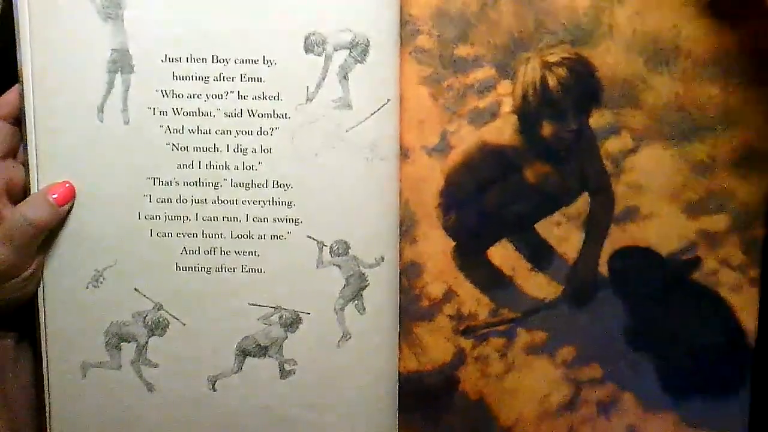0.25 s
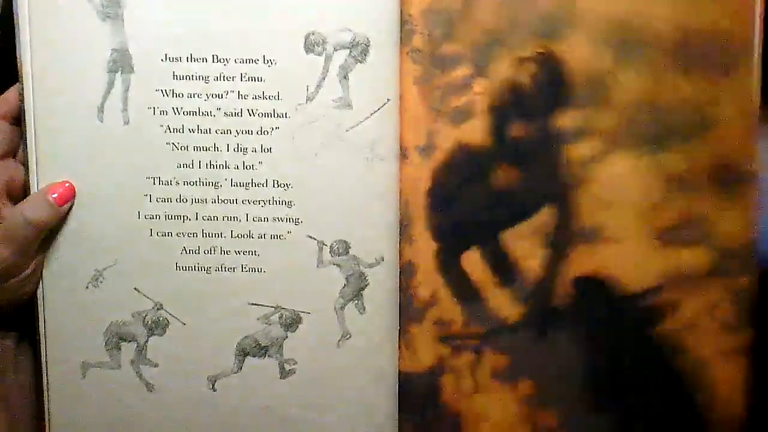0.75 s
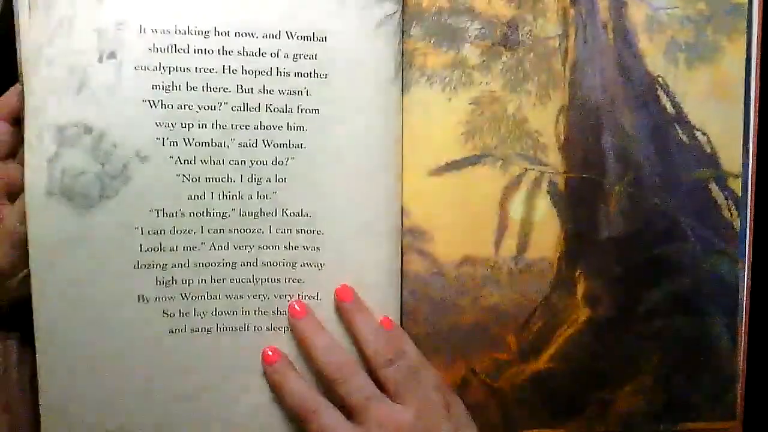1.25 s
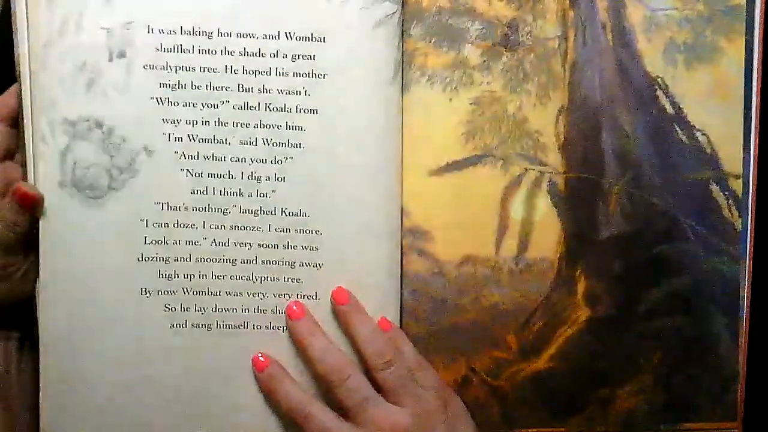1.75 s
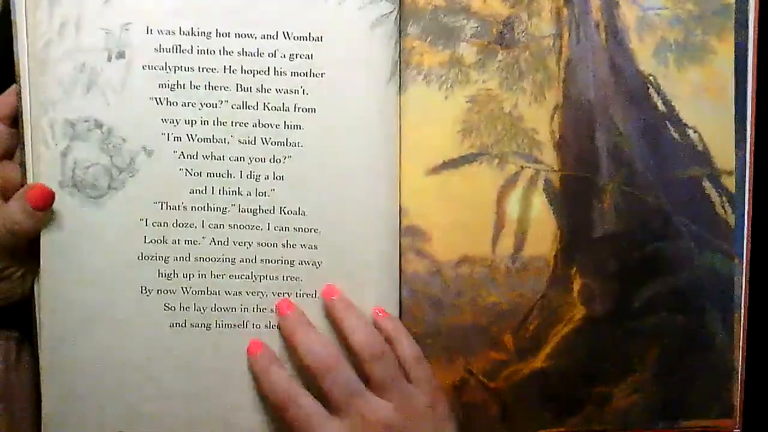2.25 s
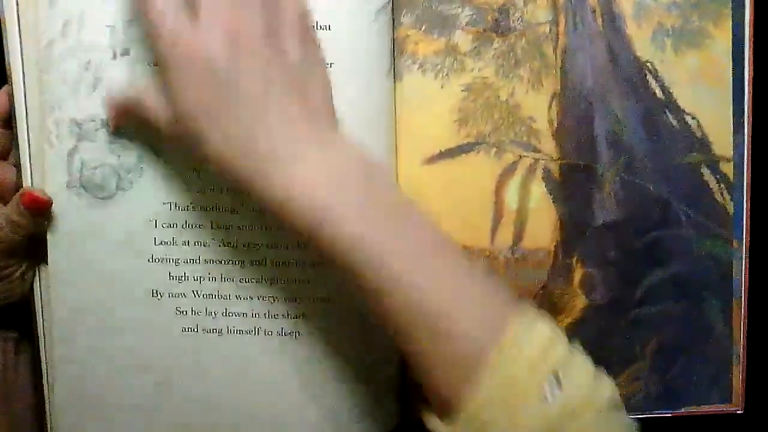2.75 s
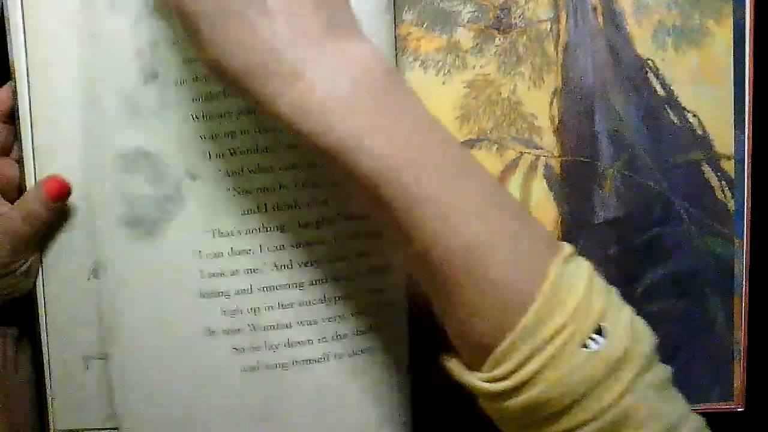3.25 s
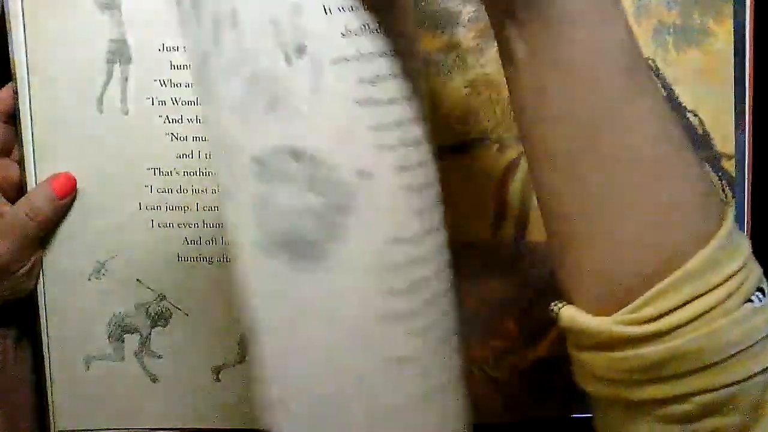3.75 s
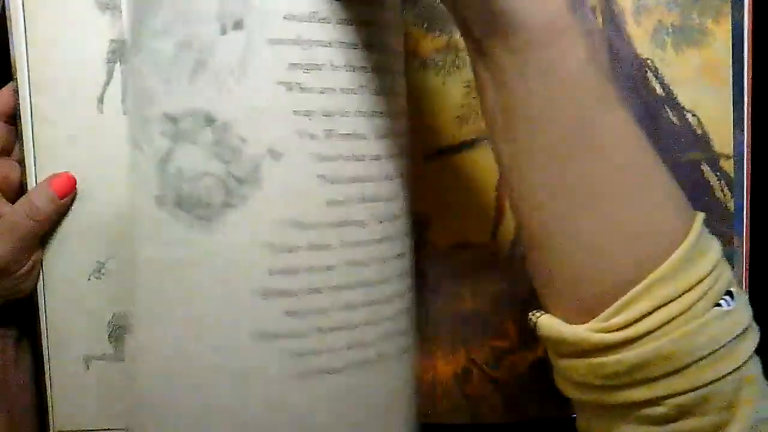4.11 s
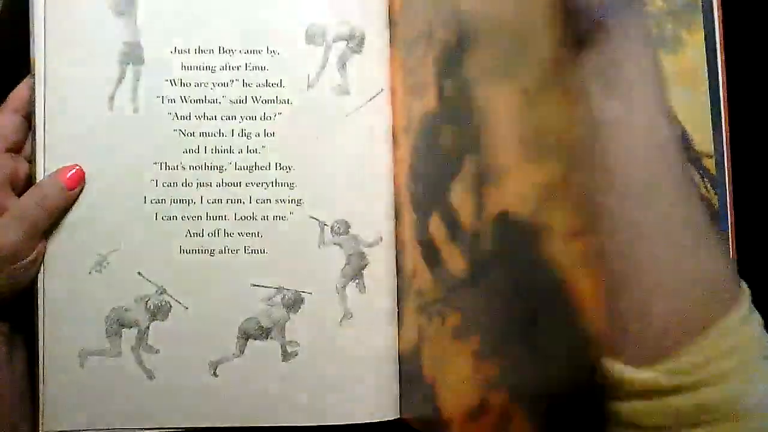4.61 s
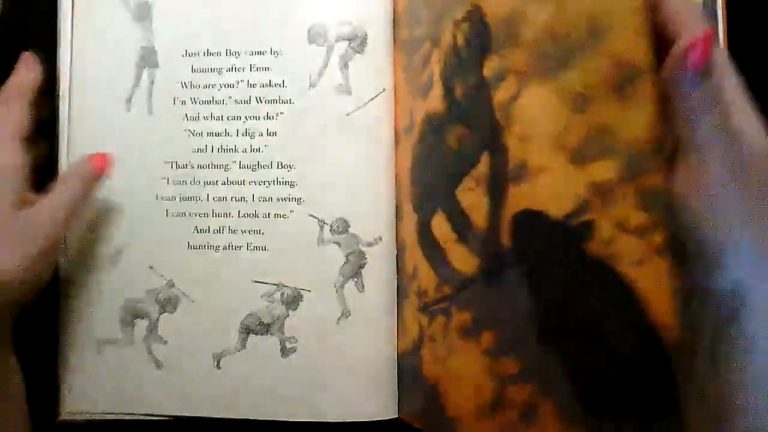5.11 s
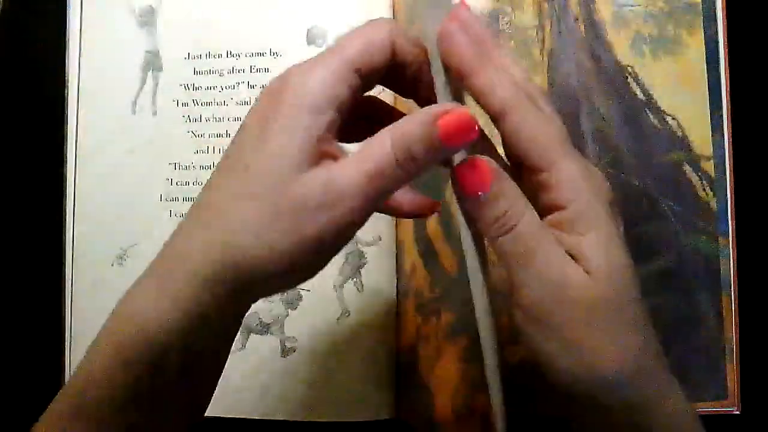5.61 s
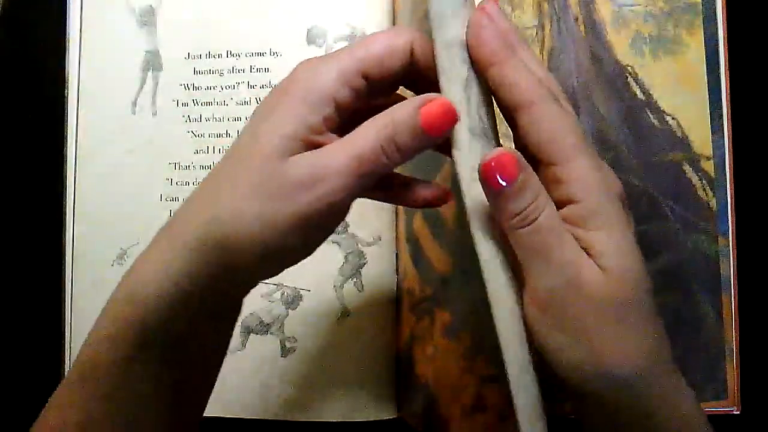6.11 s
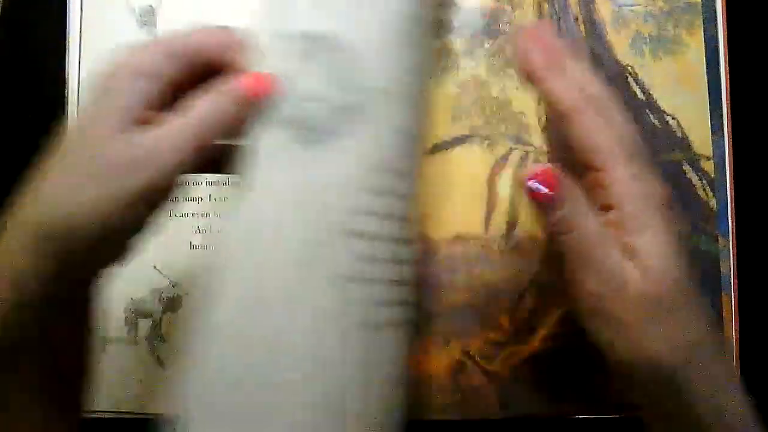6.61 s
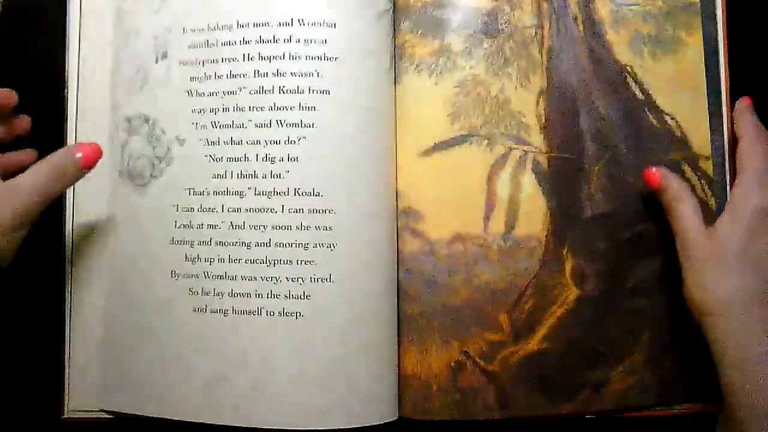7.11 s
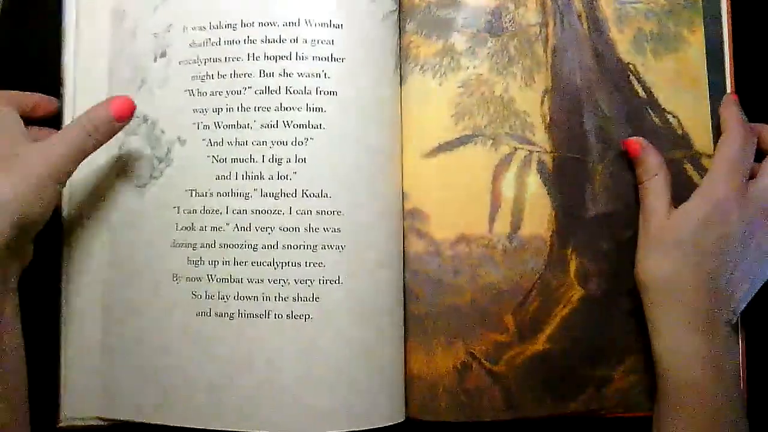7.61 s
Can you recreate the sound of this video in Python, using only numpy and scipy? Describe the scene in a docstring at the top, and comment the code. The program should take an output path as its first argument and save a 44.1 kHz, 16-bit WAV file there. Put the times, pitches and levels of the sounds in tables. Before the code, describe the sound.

A large, stiff, glossy book page is handled close to a single microphone in a quiet room. Soft rustle and finger hiss open; from 0.3 to 0.5 s the sheet buckles in a tight run of hollow, mid-pitched snaps with a swelling rustle. Another strong snap comes at 0.75 s, then weaker ones to 1.7 s with light rubbing. From about 2.2 to 3.8 s it is sparser: faint hiss, thin fingertip whistles and small isolated pops. At 3.9 s the densest, loudest burst breaks out, rapid lower-toned snaps and flapping paper until 4.3 s. Soft, low table knocks stand out afterwards, strongest around 5.1 to 5.2 s, with scattered snaps up to 6 s. A short run of brighter snaps at 6.4 to 6.7 s turns the page again. A dull thump near 7.2 s and quiet rubbing close the scene at 7.9 s.

```python
"""A large stiff page is lifted, bent and turned by hand on a table, close to one microphone, for 7.86 s.
It starts with soft rustle and finger hiss; within half a second the sheet buckles in a tight run of snaps.
Sparser snaps, hiss and whistles follow until 3.9 s, when the densest, loudest burst of snaps breaks out.
Table knocks stand out after it, a short run of snaps comes near 6.5 s, and quiet rubbing ends the scene.
Snaps are short tonal swings, rubbing and whistles are filtered noise, and knocks are decaying sine modes."""
import sys
import numpy as np
from scipy import signal
from scipy.fft import rfft, irfft, next_fast_len
from scipy.io import wavfile

SR = 44100
rng = np.random.default_rng(int(sys.argv[2]) if len(sys.argv) > 2 else 0)


def log_audio(samples):
    """Write samples as a 16-bit WAV file to the path given in sys.argv[1]."""
    # one column per channel
    frames = np.atleast_2d(samples).T
    # limit to full scale, then quantise
    limited = np.clip(frames, -1, 1)
    pcm = np.round(limited * 32767).astype(np.int16)
    wavfile.write(sys.argv[1], SR, pcm)


N = 346626

# Faint room tone. Each row: frequency in Hz, relative level in dB per Hz.
ROOM_SPECTRUM = [(20, -20), (48, -2), (64, 10.5), (90, -4.5), (169, -8.5), (222, -3.5), (424, -15),
                 (1280, -24), (2080, -32.5), (9000, -30), (15700, -32.5)]
# Low modes of the table top. Each row: pitch in Hz, free time to fall 60 dB in seconds, swell in seconds.
TABLE_MODES = [(66.1, 0.49, 0.0072), (130.5, 0.3, 0.019), (222.8, 0.083, 0.0013)]
# The book knocks the table. Each row: time in seconds (the swell begins 12 ms earlier), level of the lowest
# mode in dB, second and third mode in dB re the lowest, ring length as a share of the free ring.
BOOK_KNOCKS = [(0.104, -54, -8, -45, 0.51), (0.374, -41.5, -11, -11, 0.93), (0.797, -46, 3, -13, 0.63),
               (0.849, -44.5, 9.5, 9, 0.35), (0.989, -45.5, 2, 13, 0.45), (1.151, -54, -18.5, -29, 0.38),
               (1.668, -49.5, -13, -30, 0.67), (3.418, -56.5, -7, 3, 0.83), (3.942, -41.5, -22, -12, 1),
               (4.049, -35.5, -4, -11, 0.92), (4.196, -42, -15, -2, 0.83), (4.51, -42, -1, -3, 0.95),
               (4.599, -39, -10, 1.5, 0.42), (4.73, -50.5, 0, 2.5, 0.62), (4.892, -63, 10.5, 29, 1),
               (4.993, -47.5, 0, -36, 0.55), (5.118, -31, -6.5, -49, 0.75), (5.199, -29.5, 5.5, -6.5, 0.69),
               (5.456, -51, 6.5, 15.5, 0.89), (5.948, -61, 7, 23.5, 0.8), (6.421, -50.5, -5, 19.5, 0.5),
               (6.552, -48.5, 7, -2, 0.53), (6.99, -40.5, -11, -13.5, 0.57), (7.17, -32.5, -17, -15, 0.85),
               (7.332, -50, 8.5, 4, 0.47), (7.42, -50, -30, -9, 0.62), (7.644, -46.5, -10.5, -39.5, 1.0)]
# A fingertip drags and the glossy page whistles. Each row: time of full level in seconds, hold in seconds,
# level in dB, pitch in Hz.
PAGE_WHISTLES = [(0.135, 0.044, -58.5, 4930), (2.33, .11, -66, 5840), (2.398, 0.045, -61, 2710),
                 (3.01, .1, -74, 4140), (3.018, 0.09, -81, 6770), (4.724, 0.15, -74, 4180),
                 (4.73, 0.14, -77, 5340), (4.763, .12, -61, 1835), (5.71, 0.089, -74, 4060),
                 (7.253, .06, -71, 6800), (7.33, 0.049, -72, 4650), (7.296, 0.092, -66.5, 3090)]
# Fingers slide over the page. Each row: time of full level in seconds, swell in seconds, hold in seconds,
# hiss in dB, nail scratch in dB re the hiss.
FINGER_SLIDES = [(0, .03, 0.012, -55.5, 5.5), (.129, 0.036, 0.041, -62.5, 1), (.39, 0.13, 0.017, -63, 17.5),
                 (.49, 0.16, 0.14, -63, 4.5), (.7, 0.14, 0.056, -58, 3.5), (.92, 0.32, 0.046, -60, 0),
                 (1.0, 0.12, 0.19, -69, -2.5), (1.15, 0.23, 0.012, -62, -9),
                 (1.22, 0.13, 0.0036, -67.5, 1.5), (1.53, 0.16, 0.0047, -64.5, 4.5),
                 (2.251, 0.025, 0.011, -67, 5), (2.4, 0.3, 0.021, -67, 0), (2.6, 0.33, 0.0065, -54.5, -6),
                 (2.74, 0.42, 0.03, -58, -11), (2.886, 0.036, 0.017, -68, 0.5),
                 (3.02, 0.027, 0.089, -68, -24), (3.162, 0.014, 0.06, -48.5, -4),
                 (3.405, 0.018, 0.12, -82, 4), (3.67, 0.2, 0.032, -81.5, 2), (3.859, 0.014, 0.2, -71, 1.5),
                 (4.19, 0.25, 0.019, -72, 5), (4.43, 0.86, 0.033, -64, -2), (4.85, 0.35, 0.023, -72, -9.5),
                 (5.09, 0.57, 0.03, -74.5, -3.5), (5.459, 0.02, .003, -63, -9),
                 (5.8, 0.28, 0.0043, -72, -1), (6.288, 0.13, 0.0091, -75.5, 0.5),
                 (6.418, 0.024, 0.15, -78.5, 3.5), (6.958, 0.017, 0.0026, -81, 11),
                 (7.1, 0.09, 0.26, -73.5, -1), (7.3, 0.14, 0.095, -80.5, 3.5),
                 (7.86, 0.15, 0.0041, -73, -0.5)]
# The sheet is bent or rubbed. Each row: time of full level in seconds, swell in seconds, hold in seconds,
# rustle in dB, flapping depth in dB re the rustle, scraping rim in dB re the rustle.
SHEET_BENDS = [(0, .03, 0.027, -53, 3.5, 0), (.165, 0.15, 0.013, -65.5, -13, 9),
               (.285, 0.035, .03, -53, -2.5, -28), (.392, 0.11, 0.033, -35, -6, -9.5),
               (.45, 0.033, 0.047, -45, 2.5, -6.5), (.58, 0.088, 0.083, -56.5, -7.5, 4),
               (.755, 0.09, 0.0022, -34, 1, -33), (.828, 0.11, 0.023, -40, 2, -24),
               (.9, .05, 0.032, -57, -21, -1), (.972, 0.027, 0.037, -47.5, 9.5, -32),
               (1.15, 0.22, 0.002, -71.5, 6, 4.5), (1.205, 0.0095, 0.029, -48.5, -5, -7.5),
               (1.44, 0.022, 0.018, -72, 5, 5), (1.53, .14, .005, -49.5, -8.5, -10),
               (1.62, 0.0087, 0.0092, -42.5, -0.5, 2.5), (1.67, 0.045, 0.015, -42, -18.5, -11.5),
               (2.251, 0.016, 0.0025, -55.5, -32, -14), (2.41, 0.22, 0.065, -61, -30, 0.5),
               (2.53, 0.21, 0.056, -71, -31, 5), (2.72, 0.2, 0.11, -85, -19, 6.5),
               (2.89, 0.022, 0.0088, -56.5, -16.5, -37.5), (2.935, .05, 0.006, -59, -3, -18),
               (3.02, .05, 0.067, -58, -7.5, -6.5), (3.162, 0.025, 0.051, -49, -4.5, 0.5),
               (3.305, 0.023, 0.0017, -47.5, 5.5, -12), (3.405, .05, 0.15, -62, -29, -10),
               (3.669, 0.21, 0.026, -57, -15, -15.5), (3.859, 0.052, 0.14, -45, 2, -21),
               (3.92, 0.077, 0.051, -46.5, 12.5, -2.5), (4.08, 0.28, 0.16, -39.5, 2.5, -6),
               (4.29, .1, 0.049, -43, 0, -15.5), (4.4, 0.076, 0.037, -61, -31, -0.5),
               (4.463, .015, 0.021, -57, 14, -22), (4.535, 0.05, 0.0073, -71, 25.5, -9),
               (4.62, 0.092, 0.04, -75.5, 30, -36), (4.715, .06, 0.0068, -64, 12.5, -26.5),
               (4.695, 0.02, .19, -70, -30, 2), (4.99, 0.19, 0.058, -69, 12.5, -14),
               (5.06, 0.0092, 0.036, -64.5, 12, -0.5), (5.188, .015, 0.0056, -43, 11, -9.5),
               (5.457, 0.015, 0.044, -37, 7, -23), (5.61, .012, 0.052, -66, 0, 0),
               (5.713, 0.011, 0.01, -57, -17, 2.5), (5.8, 0.2, 0.0021, -52, -13.5, -5.5),
               (5.938, 0.012, 0.019, -46.5, -0.5, -19), (6.055, 0.03, 0.03, -69, 12, -11),
               (6.288, 0.19, 0.014, -75, -21, 10), (6.414, 0.01, 0.014, -44.5, 3.5, -29),
               (6.5, .05, 0.11, -53, 1, -9.5), (6.65, .15, 0.016, -53.5, 3, -25),
               (6.955, 0.013, .003, -65.5, 6.5, 3.5), (7.075, .015, 0.09, -70, -17, 3),
               (7.125, 0.11, 0.17, -66, 7, -10.5), (7.36, 0.0933, 0.033, -81.5, 18.5, 7),
               (7.451, 0.065, 0.059, -77.5, -2, -2), (7.63, 0.044, 0.0043, -65.5, 1.5, -1),
               (7.86, .12, .003, -61.5, -33, -11.5)]
# Colours of the page's five parts. Each row: frequency in Hz, relative level in dB per Hz.
RUSTLE_SPECTRUM = [(290, -32.5), (500, -11), (559, -4), (761, 6.5), (1260, 11), (1370, 7), (1860, -7),
                   (2400, -28), (3120, -59.5), (5280, -120)]
FLAP_SPECTRUM = [(120, -9.5), (200, -1), (400, -8.5), (600, -9), (900, -19.5)]
RIM_SPECTRUM = [(1400, 5), (1900, 0.5), (2700, 2.5), (3300, -6.5), (5000, -38)]
SCRATCH_SPECTRUM = [(2800, -12.5), (3600, -2.5), (5800, -2.5), (7200, -19)]
HISS_SPECTRUM = [(5000, -34), (6600, -3.5), (8500, -3.5), (10500, -2.5), (13000, -10), (15900, -12)]
# The sheet buckles. Each row: start in seconds, swing peak in dB, pitch in Hz, crack in dB re the swing peak,
# ring length as a multiple of a dry snap's.
BUCKLES = [(.326, -26.5, 1340, -19.5, 1.7), (0.348, -17.5, 1430, -20, 4.2), (.378, -16, 1450, -15, 1.6),
           (.398, -16, 1400, -24.5, 2.6), (0.412, -19.5, 1010, -20.5, 1.37), (0.431, -30.5, 1210, -25.5, 2),
           (0.443, -21.5, 1250, -22, 2.2), (0.463, -33, 1110, -27, 2.6), (0.475, -25.5, 1140, -16, 1.1),
           (.541, -44, 1360, 4.5, 4.5), (.733, -36.5, 1130, -9, 3.9), (0.748, -17.5, 1070, -33, 3.15),
           (0.82, -29, 820, -57, 1.7), (0.893, -33, 840, -13, 2.3), (0.975, -24.5, 920, -53, 0.8),
           (1.206, -39, 793, -32.5, 2.9), (1.619, -31.5, 1320, -36.5, 0.71), (1.663, -26, 1360, -67, 5.6),
           (2.249, -36.5, 1200, -25, 1.6), (2.885, -46, 1400, -33, 5.8), (3.012, -38, 1006, -19.5, 3.6),
           (3.101, -41, 1110, -19, 3.6), (3.175, -28.5, 1185, -39, 2.7), (3.207, -48.5, 1090, 5.5, 1.5),
           (3.397, -41.5, 793, -16, 7.9), (3.858, -38, 990, -28, 2.4), (3.911, -16.5, 860, -34, 1.22),
           (3.947, -25, 1020, -38.5, 1.05), (3.961, -25.5, 980, -53, 1.8), (3.966, -19, 686, -40.5, 0.56),
           (3.976, -21.5, 770, -39.5, 0.25), (3.985, -18, 710, -33.5, 1.06), (4.012, -19, 1049, -37, 0.56),
           (4.021, -12, 955, -25, 1.2), (4.057, -11.5, 930, -24.5, 0.94), (4.104, -23, 785, -37, 1.1),
           (4.118, -12.5, 832, -26, 1.6), (4.156, -11.5, 835, -25, 1.7), (4.178, -19, 860, -30, 2.8),
           (4.184, -12.5, 730, -23, 1.26), (4.208, -15.5, 1030, -29.5, 1.02), (4.237, -30, 790, -24, 0.6),
           (4.286, -35, 990, -47, 1.5), (4.313, -24, 1060, -43, 1.04), (4.462, -36, 687, -30, 1.6),
           (5.183, -23, 1010, -35, 1.5), (5.443, -34, 880, -15, 2), (5.516, -28.5, 765, -25, 0.8),
           (5.712, -42.5, 1040, -22.5, 5.1), (5.945, -34, 743, -32, 2.15), (6.415, -28, 560, -54, 1.5),
           (6.482, -25.5, 1120, -27.5, 1.06), (6.515, -20, 1310, -28.5, 0.84),
           (6.564, -18, 1400, -30, 1.38), (6.618, -31, 1120, -58, 0.95), (6.663, -41.5, 1245, -28, 6.5),
           (6.951, -56, 775, 7, 3.5), (7.127, -39, 634, -16, 4), (7.301, -43, 642, -40, 5.8)]
# Resonances between table and microphone. Each row: frequency in Hz, width in Hz, boost in dB.
NEARBY_RESONANCES = [(1106, 520, 6), (4190, 410, 6.5)]

SWELL_DB = 40   # rise over one swell time
BEND_FADE_DB_PER_S, SLIDE_FADE_DB_PER_S = 429.5, 395


def amp(db):
    """Gain of a level in dB."""
    return 10 ** (np.asarray(db) / 20)


def rms_one(x):
    """Sound scaled to rms 1."""
    return x / np.sqrt(np.mean(x ** 2) + 1e-20)


def band_noise(noise, order, band_hz):
    """Noise kept within a band, at rms 1."""
    return rms_one(signal.sosfilt(signal.butter(order, band_hz, "band", fs=SR, output="sos"), noise))


def coloured(x, spectrum):
    """Sound shaped by a spectrum drawn on a log-frequency axis, at rms 1."""
    size = next_fast_len(N)
    hz = np.maximum(np.arange(size // 2 + 1) * SR / size, 1)
    point_hz, point_db = np.array(spectrum).T
    gain = amp(np.interp(np.log(hz), np.log(point_hz), point_db, -90, -90))
    return rms_one(irfft(rfft(x, size) * gain, size)[:N])


def drift(rate_hz):
    """Slow chance around zero with spread 1: noise through a two-pole low-pass at every 20th sample."""
    r = np.exp(-40 * np.pi * rate_hz / SR)
    noise = rng.standard_normal(N // 20 + 3002)
    slow = signal.lfilter([1], [1, -2 * r, r * r], noise)[3000:]   # the filter has settled by here
    return np.interp(np.arange(N) / 20, np.arange(len(slow)), rms_one(slow))


def resonate(x, hz, width_hz):
    """One resonance: a band-pass with gain 1 at its top."""
    r = np.exp(-np.pi * width_hz / SR)
    feedback = [1, -2 * r * np.cos(2 * np.pi * hz / SR), r * r]
    return signal.lfilter([(1 - r * r) / 2, 0, (r * r - 1) / 2], feedback, x)


def strokes(rows, fade_db_per_s, rest_db):
    """Hand strokes swell, hold, fade and add in power: one dB curve for the level and for each colour."""
    t = np.arange(0, N + 32, 32) / SR
    full_s, swell, hold, level_db, *colours = np.transpose(rows)[:, :, None]
    rise_db = SWELL_DB * np.maximum(full_s - t, 0) / np.maximum(swell, .005)
    fall_db = fade_db_per_s * np.maximum(t - full_s - hold, 0)
    shape_db = level_db - rise_db - fall_db
    curves = []
    for colour_db in [0, *colours]:
        power = np.sum(amp(shape_db + colour_db) ** 2, axis=0) + amp(rest_db) ** 2
        curves.append(np.interp(np.arange(N) / SR, t, 10 * np.log10(power)))
    return curves


def grains(per_s, spread_db, clump_db, clump_rate_hz, smooth):
    """Tiny fibre cracks at random, in clumps, over a share of smooth friction noise."""
    sizes = amp(spread_db * np.minimum(rng.exponential(1, N), 5)) * rng.choice([-1, 1], N)
    born = rng.random(N) < per_s / SR
    noise = rms_one(sizes * born) + smooth * rng.standard_normal(N)
    return noise * amp(clump_db * drift(clump_rate_hz))


def room_tone():
    """Faint coloured noise whose level wanders slowly around -76 dB."""
    return amp(-76 + 2.5 * drift(2.5)) * coloured(rng.standard_normal(N), ROOM_SPECTRUM)


def knocks():
    """Soft pushes of the heavy book: low table modes swell, waver and die; the next push stops them."""
    waver = 0.024          # share by which the hands' load bends the pitch
    fade_power = 1.37      # above 1 the fade steepens as it goes
    stop_db_per_s = 404    # extra fade once the next push begins
    out, t = np.zeros(N + SR), np.arange(SR) / SR
    bent_time = np.cumsum(1 + waver * np.pad(drift(6.7), (0, SR))) / SR
    next_times = [row[0] for row in BOOK_KNOCKS[1:]] + [np.inf]
    for (s, level_db, second_db, third_db, ring), next_s in zip(BOOK_KNOCKS, next_times):
        i = round((s - .012) * SR)
        elapsed = bent_time[i:i + SR] - bent_time[i]
        stop_db = stop_db_per_s * np.maximum(t - (next_s - s), 0)
        for (hz, t60, swell), mode_db in zip(TABLE_MODES, [0, second_db, third_db]):
            fade_db = 60 * (t / (t60 * np.clip(ring, .2, 3))) ** fade_power
            shape = (1 - np.exp(-(t / swell) ** 2)) * amp(-fade_db - stop_db)
            out[i:i + SR] += amp(level_db + mode_db) * shape * np.sin(2 * np.pi * hz * elapsed)
    return out[:N]


def squeaks():
    """Fingertip whistles: uneven friction noise passed twice through each narrow band."""
    swell_s, width_hz = 0.038, 140
    out, t = np.zeros(N + SR), np.arange(SR // 2) / SR - .1   # t is 0 at full level
    noise = rng.standard_normal(N + SR) * amp(np.pad(3.5 * drift(25), (0, SR)))
    for s, hold, level_db, hz in PAGE_WHISTLES:
        i = round((s + t[0]) * SR)
        band = resonate(resonate(noise[i:i + len(t)], hz, width_hz), hz, width_hz)
        band = band * np.sqrt(SR / width_hz) / 2   # makes up for the level lost in the narrow band
        rise_db = SWELL_DB * np.maximum(-t, 0) / swell_s
        fall_db = SLIDE_FADE_DB_PER_S * np.maximum(t - hold, 0)
        out[i:i + len(t)] += amp(level_db - rise_db - fall_db) * band
    return out[:N]


def rubbing():
    """The handled page: crackling rustle, flap and rim from bending, scratch and hiss from sliding fingers."""
    # the last number is the resting level in dB while the hands lie still
    rustle_db, flap_db, rim_db = strokes(SHEET_BENDS, BEND_FADE_DB_PER_S, -92)
    hiss_db, scratch_db = strokes(FINGER_SLIDES, SLIDE_FADE_DB_PER_S, -100)
    bent = np.clip((rustle_db + 75.5) / 26, .15, 1)   # light strokes rub smoothly, hard bends crackle
    crackle = grains(per_s=700, spread_db=4.8, clump_db=3, clump_rate_hz=40, smooth=.35)
    smooth_rub = rng.standard_normal(N) * amp(2.1 * drift(9.1))
    crinkle = bent * crackle + np.sqrt(1 - bent ** 2) * smooth_rub
    friction = grains(per_s=6000, spread_db=3.0, clump_db=2.5, clump_rate_hz=25, smooth=.9)
    rustle = amp(rustle_db) * coloured(crinkle, RUSTLE_SPECTRUM)
    flap = amp(flap_db) * coloured(crinkle, FLAP_SPECTRUM)
    rim = amp(rim_db) * coloured(crinkle, RIM_SPECTRUM)
    scratch = amp(scratch_db) * coloured(crinkle + friction, SCRATCH_SPECTRUM)
    hiss = amp(hiss_db) * coloured(friction, HISS_SPECTRUM)
    return rustle + flap + rim + scratch + hiss


def panels(x, count):
    """Narrow modes of the bent sheet at scattered pitches, each coming and going by chance up to a ceiling."""
    low_hz, high_hz = 248.8, 10940
    level_db, spread_db, change_rate_hz = -7.5, 17.5, 2.82
    bypass = 0.49   # share of the low-passed sound kept: between the modes the sheet radiates less
    step = np.log(high_hz / low_hz) / count
    pitches = low_hz * np.exp(step * (np.arange(count) + rng.random(count)))
    rings = 0
    for k, hz in enumerate(pitches):
        open_db = spread_db * np.tanh(drift(change_rate_hz))
        rings = rings + (-1) ** k * amp(open_db) * resonate(x, hz, 20 + hz / 55)   # signs alternate
    low = signal.sosfilt(signal.butter(2, high_hz, fs=SR, output="sos"), x)
    return x - (1 - bypass) * low + amp(level_db) * rings


def snaps():
    """Buckles: a few swings of the sheet, a shove of air and a dying rustle; bright cracks come apart."""
    push_s, push_db = .004, -2   # air shoved out and back once: length, and dB re a swing peaking at 0 dB
    push_growth = 0.61           # dB the shove gains on the swing per dB of swing peak
    crack_hold_s = 0.0014        # for a dry snap; it lengthens with the ring
    after_rustle_db = -7.5       # re the swing peak
    out, cracks, t = np.zeros(N + SR), np.zeros(N + SR), np.arange(SR // 8) / SR
    body_noise, bright_noise = rng.standard_normal((2, N + SR))
    body = band_noise(body_noise, 4, [350, 1800])
    bright = band_noise(bright_noise, 1, [1400, 3200])
    push = -amp(push_db) * np.sin(2 * np.pi * t / push_s) * np.sin(np.pi * t / push_s) * (t < push_s)
    for s, peak_db, hz, crack_db, ring in BUCKLES:
        i = round(s * SR)
        span = slice(i, i + len(t))
        cycles = t * hz - 1.1 * np.sqrt(ring)   # counted from the deepest swing
        width = np.where(cycles < 0, .55 * np.sqrt(ring), .8 * ring)
        swing = -np.cos(2 * np.pi * cycles) * np.exp(-(cycles / width) ** 2)
        sharp_fade = amp(-60 * np.maximum(t - crack_hold_s * ring, 0) / 0.011)
        crack_shape = np.minimum(t / 0.00091, 1) * (sharp_fade + 0.2 * amp(-60 * t / 0.29))
        tail_shape = np.minimum(t / 0.0056, 1) * amp(-60 * t / (0.024 * ring))
        tail = amp(after_rustle_db) * body[span] * tail_shape
        out[span] += amp(peak_db) * (swing + amp(push_growth * peak_db) * push + tail)
        cracks[span] += amp(peak_db + crack_db) * bright[span] * crack_shape
    return out[:N], cracks[:N]


def scene():
    """Paper heard through the nearby resonances, plus the table and a faint, uneven room tone."""
    swings, cracks = snaps()
    paper = panels(rubbing() + cracks, count=44) + swings + squeaks()
    heard = paper.copy()
    for hz, width_hz, boost_db in NEARBY_RESONANCES:
        heard += (amp(boost_db) - 1) * resonate(paper, hz, width_hz)
    return (heard + knocks() + room_tone())[None]


def record(dry):
    """The microphone drops the deepest bass below 48 Hz; the top is cut steeply, 70 dB down from 16.3 kHz."""
    lean = signal.sosfilt(signal.butter(2, 48, "high", fs=SR, output="sos"), dry)
    return signal.sosfilt(signal.cheby2(14, 70, 16300, fs=SR, output="sos"), lean)


dry = scene()
out = record(dry)
log_audio(out)
```